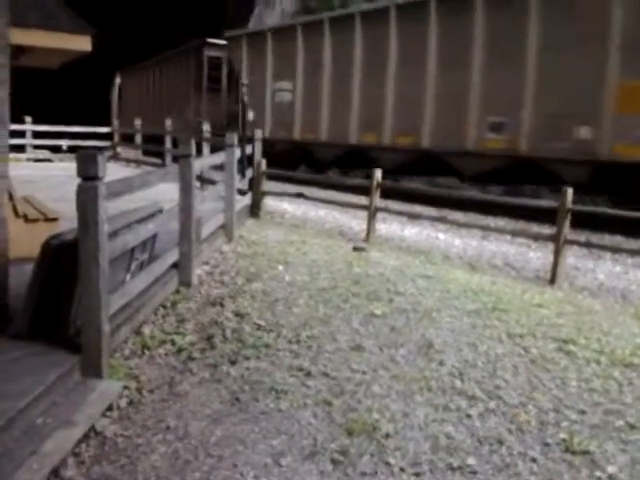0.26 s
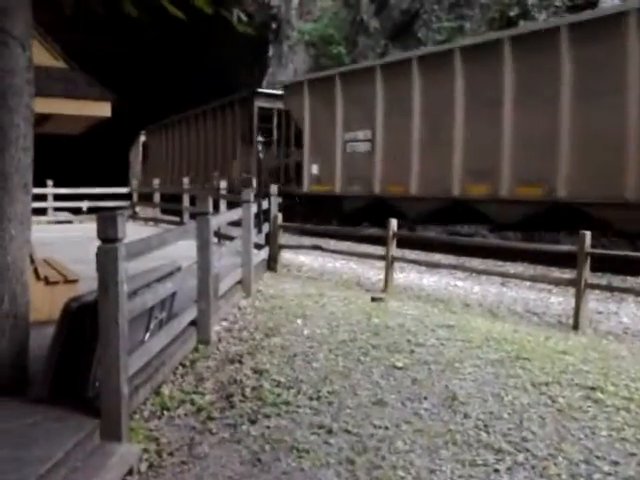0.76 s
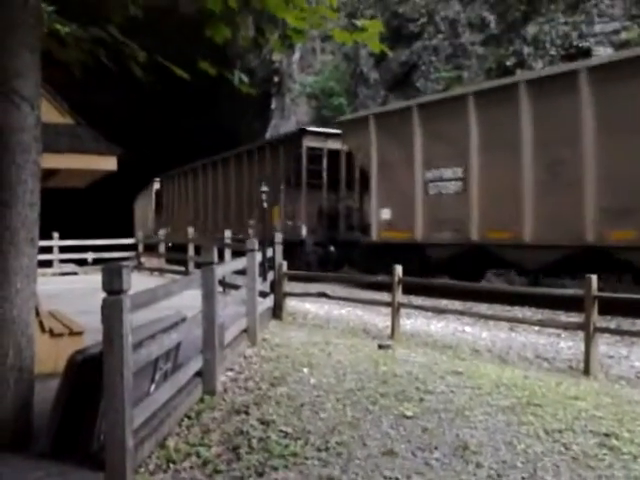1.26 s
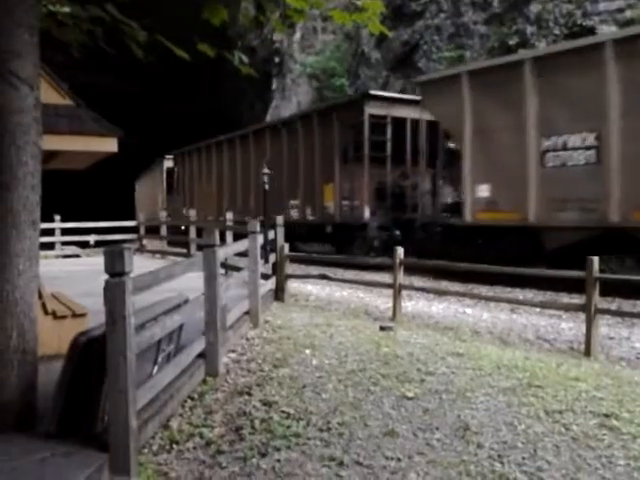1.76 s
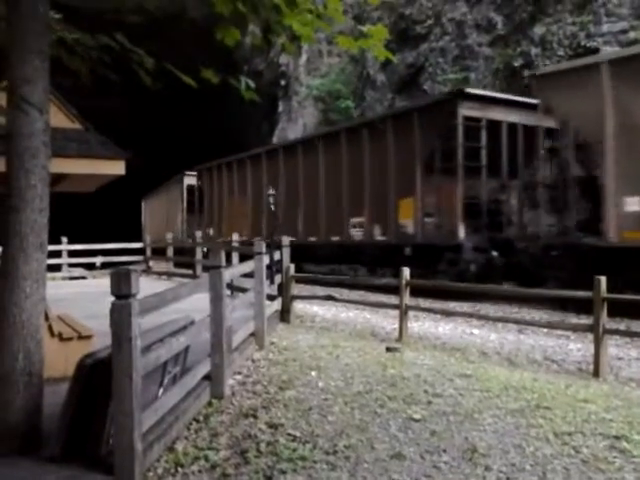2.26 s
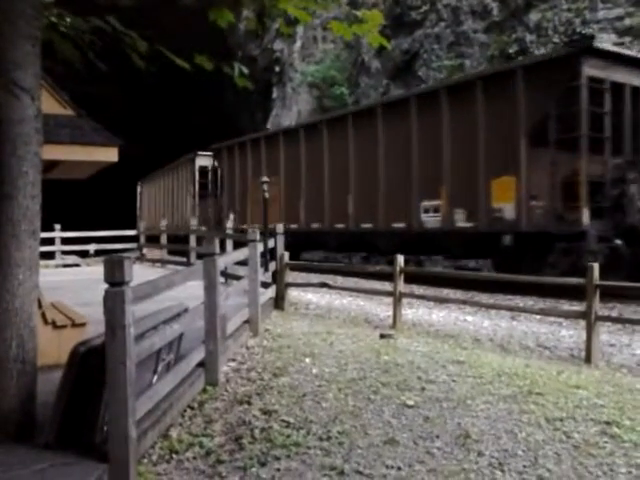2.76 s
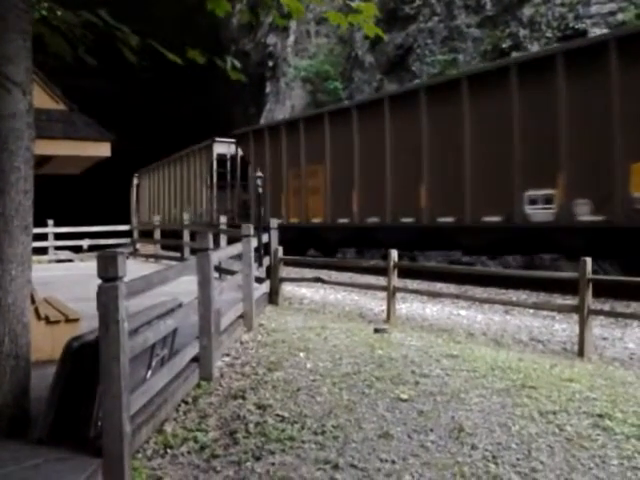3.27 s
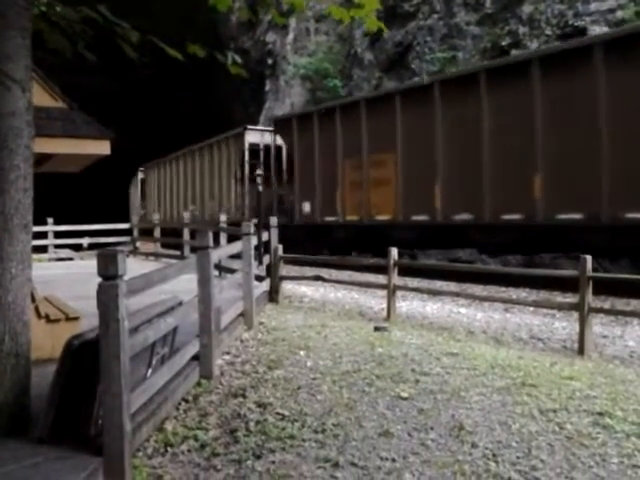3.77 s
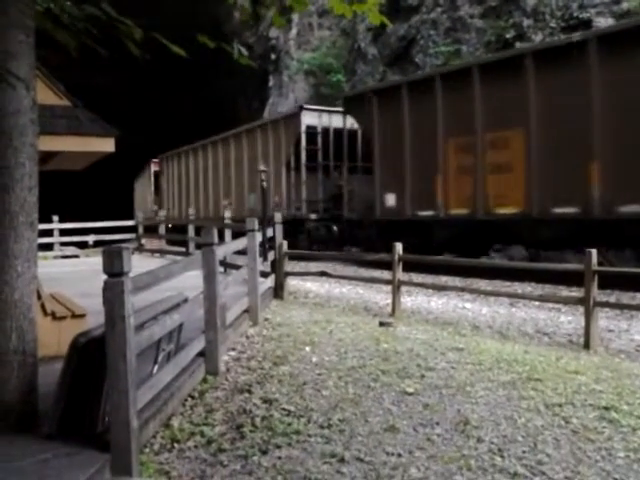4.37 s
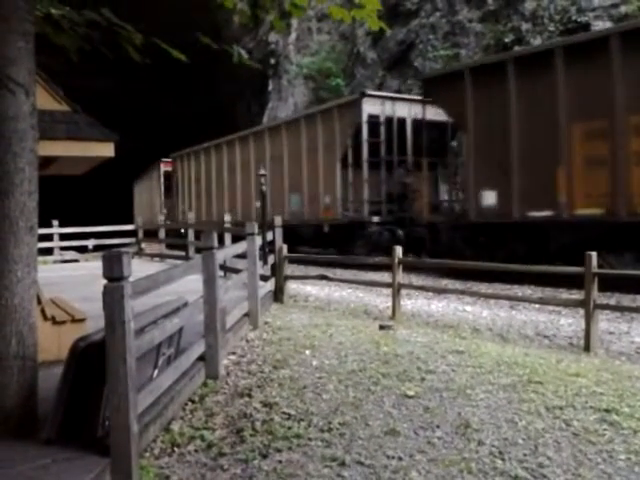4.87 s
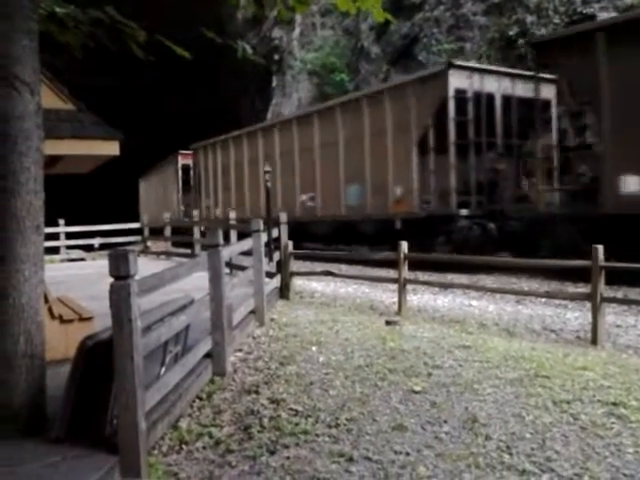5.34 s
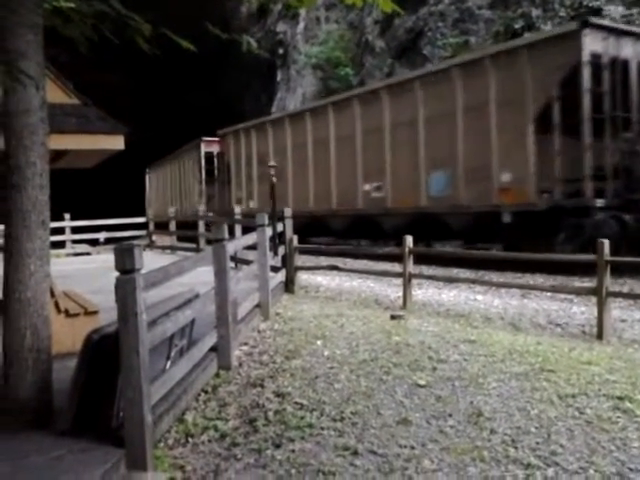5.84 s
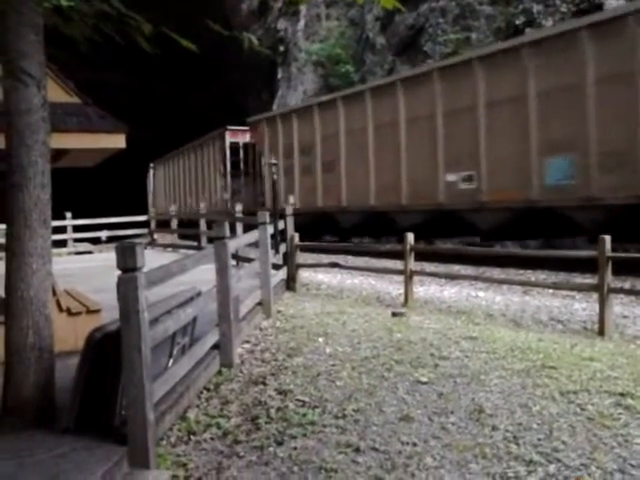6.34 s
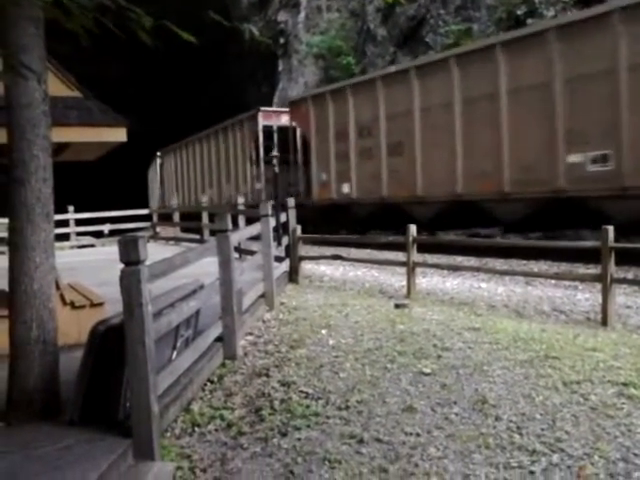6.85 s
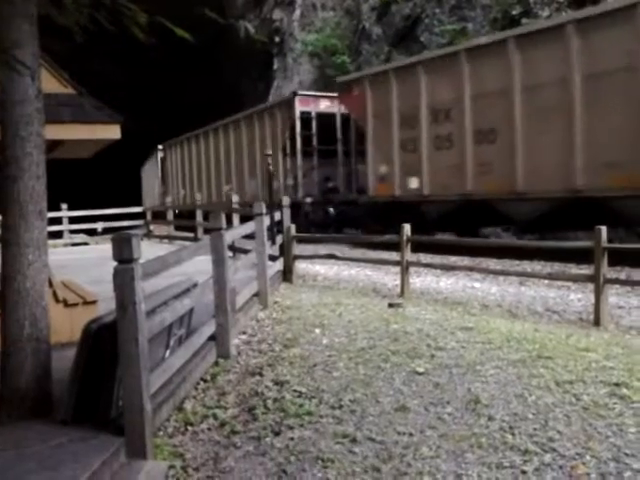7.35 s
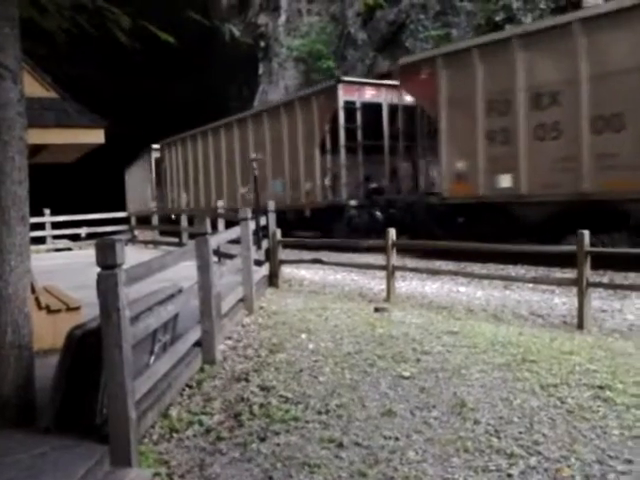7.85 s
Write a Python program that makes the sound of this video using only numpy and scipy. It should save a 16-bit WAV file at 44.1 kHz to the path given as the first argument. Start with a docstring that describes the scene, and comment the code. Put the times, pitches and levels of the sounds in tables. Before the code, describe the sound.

Continuous harsh screeching of steel wheels on rails as heavy hopper cars pass nearby. Very high whistling tones, some clean and some rough, overlap and swap quickly above scraping flange hiss and ringing metal. Around halfway the squealing eases, leaving fine sizzle, faint high chimes, rolling rumble and soft thuds, with a few later shrieks. Open-air rocky place, near microphone, identical channels, slightly overloaded at the loudest moments.

```python
"""Piercing wheel squeals over a bright flange hiss: loaded freight cars round a curve close by, under a rock face.
Treads creep sideways on the rail and lock one wheel mode after another: sines plus narrow noise.
Flanges grind with hiss, sizzle, rasp and disc ringing; rolling adds rumble, roar and rail ring: all filtered noise.
Other wheels chime faintly and bogies jolt. A limiter flattens the loudest screeching; both channels are equal."""
import sys
import numpy as np
from scipy import signal
from scipy.fft import rfft, irfft, next_fast_len
from scipy.io import wavfile
from scipy.ndimage import uniform_filter1d, minimum_filter1d

SR = 44100
rng = np.random.default_rng(int(sys.argv[2]) if len(sys.argv) > 2 else 0)


def file_out(sig):
    """Save sig as 16-bit WAV at sys.argv[1]."""
    # one column per channel
    cols = np.atleast_2d(sig).T
    # limit, then scale
    lim = np.clip(cols, -1, 1)
    pcm = np.round(lim * 32767).astype(np.int16)
    wavfile.write(sys.argv[1], SR, pcm)


N = 357651
TIME = np.arange(N) / SR
BINS_HZ = np.maximum(np.fft.rfftfreq(next_fast_len(N), 1 / SR), 1)


def from_db(db):
    """Decibels to amplitude gain."""
    return 10 ** (np.asarray(db) / 20)


def rms_one(x):
    """Scale to unit power."""
    return x / np.sqrt(np.mean(np.abs(x) ** 2) + 1e-20)


def in_time(rows):
    """Interpolate each column of a curve over TIME; the first column is time_s."""
    time_s, *columns = np.transpose(rows)
    return [np.interp(TIME, time_s, column) for column in columns]


def drift(rate_hz, size=N):
    """Smooth random signal of rms about 1 that changes about rate_hz times a second."""
    step = 10   # samples per slow point
    pole = np.exp(-2 * np.pi * rate_hz * step / SR)
    noise = rng.standard_normal(size // step + 4002)
    slow = signal.lfilter([1], [1, -2 * pole, pole * pole], noise)[4000:]   # skip the settling
    return np.interp(np.arange(size) / step, np.arange(len(slow)), rms_one(slow))


def colour(points):
    """Amplitude gain at every bin from a short spectrum, interpolated over log frequency."""
    hz, db = np.transpose(points)
    return from_db(np.interp(np.log(BINS_HZ), np.log(hz), db))


def shaped(force, gain):
    """A contact force heard through a frequency response; rms 1."""
    size = next_fast_len(N)
    return rms_one(irfft(rfft(force, size) * gain, size)[:N])


def friction(flutter_db, rate_hz):
    """Random contact force whose strength flutters as the surfaces catch and slip."""
    return rng.standard_normal(N) * from_db(flutter_db * drift(rate_hz))


def singing_mode(pitch_hz, rough, width_hz, wobble=0.000903):
    """A self-excited wheel mode: a steady sine plus its reflections, smeared by the motion of the cars."""
    size = len(pitch_hz)
    rough = np.clip(rough, 0, 1)
    wobbling_hz = pitch_hz * (1 + wobble * drift(14.96, size))
    phase = 2 * np.pi * np.cumsum(wobbling_hz) / SR
    cosine_part = drift(0.86 * width_hz, size) * np.cos(phase)
    sine_part = drift(0.69 * width_hz, size) * np.sin(phase)
    return np.sqrt(2 * (1 - rough)) * np.sin(phase) + np.sqrt(rough) * (cosine_part + sine_part)


# flange bites: centre_s, length_s (between 1/e points), rise_db
FLANGE_BITES = [(0.082, 0.044, 6.5), (0.193, 0.081, 5), (.272, .025, 6), (0.372, 0.044, 5), (.54, .036, 10),
                (.68, .1, 3.5), (1.33, 0.053, 0), (2.49, 0.045, 5), (4.0, .08, 5), (5.92, 0.12, 3.5),
                (6.654, 0.1, 2)]


def bite_db():
    """A flange bites hard: a short smooth bump in the grinding level."""
    return sum(db * np.exp(-(2 * (TIME - when) / length) ** 2) for when, length, db in FLANGE_BITES)


# wheel modes locking into squeals:
# start_s, length_s, build_up_s, mid_pitch_hz, level_db (before surge and bite), roughness (0 clean, 1 rough)
WHEEL_SQUEALS = [ (0, .88, 0.0024, 6220, -11, 0.12), (0, 0.78, 0.006, 4280, -28.5, 1),
                 (0, .28, .02, 1703, -38, 0.8), (0, 1.63, .4, 9140, -25, 0.8),
                 (0, 2.5, .2, 7210, -22.5, 1.1), (0, 0.73, .01, 13585, -27, .8),
                 (.04, 0.26, 0.025, 8230, -13.5, 0.45), (.3, 0.54, .1, 1163, -37, 0.76),
                 (.45, 2.3, .5, 13535, -21, .75), (.6, .5, .15, 8555, -22, .6),
                 (1.5, .9, .2, 936, -39, .45), (0.693, 0.62, 0.19, 1707, -36, 0.5),
                 (0.697, 4.2, 0.3, 2567, -30.5, 0.65), (0.748, 1.58, .1, 6210, -20, 0.52),
                 (0.749, 1.14, 0.14, 8085, -18, .45), (1.048, 0.24, 0.088, 3460, -27.5, 0.15),
                 (1.05, .26, .1, 5250, -29, 0.3), (1.36, 0.26, 0.11, 5270, -25, 0.2),
                 (1.133, 0.6, 0.12, 936, -33, 0.1), (1.152, 0.34, .1, 4335, -32.5, 0.3),
                 (1.453, 0.36, .18, 4330, -25.5, .3), (1.652, .29, .04, 5238, -23, 0.1),
                 (1.723, 0.44, .08, 8200, -17.5, 0.9), (1.897, 2.9, .15, 6430, -33, 0.7),
                 (1.947, 0.75, 0.12, 7290, -16.5, .7), (1.952, 2.6, 1, 9210, -19, 0.83),
                 (2.15, 0.6, 0.11, 5290, -25.5, 0.45), (2.35, 1, 0.097, 8270, -17.5, 0.66),
                 (2.481, .28, 0.058, 7298, -13, 0.4), (2.498, 0.17, .04, 6360, -17, .3),
                 (2.619, 0.49, 0.11, 6390, -21.5, .55), (2.57, 0.43, 0.18, 3505, -20.5, 0.16),
                 (2.618, 0.34, .12, 5390, -18.5, 0.2), (2.758, 0.47, 0.062, 1713, -32, 0.2),
                 (2.717, 1.66, 0.064, 7325, -21, 0.74), (2.8, 0.97, .2, 8470, -21, 0.8),
                 (2.798, 1.1, 0.22, 11300, -28.5, .6), (2.92, 0.45, 0.067, 5358, -17, 0.48),
                 (3.0, 0.9, 0.053, 3486, -29.5, 0.37), (3.1, 0.81, .25, 10050, -26, 0.5),
                 (3.268, 0.3, 0.045, 7280, -14, .4), (3.3, 0.32, 0.072, 9120, -11.5, .45),
                 (3.328, 0.415, 0.072, 6350, -18, 0.2), (3.492, 0.2, .07, 8280, -10, 0.3),
                 (3.598, 0.35, 0.16, 5330, -18, 0.4), (3.853, 0.24, .1, 8400, -17, 0.6),
                 (3.881, .22, .08, 7260, -22, .5), (4.02, 0.22, 0.023, 5320, -21.5, 0.42),
                 (4.147, 0.37, .05, 5360, -30, 0.65), (4.09, 0.26, 0.048, 960, -36, 0.25),
                 (4.08, 0.23, 0.063, 2594, -27.5, 0.5), (4.3, 0.65, .2, 8580, -36, 0.5),
                 (4.42, 1.04, 0.32, 6485, -21, 0.9), (4.75, .47, .15, 9410, -24.5, .6),
                 (4.85, .55, .2, 2951, -37, .6), (5.3, 1.7, .2, 13610, -32.5, .9),
                 (5.75, .67, .15, 15042, -28.5, .45), (5.8, 1.6, .25, 8085, -27, .7),
                 (5.85, .8, .2, 10630, -29, .6), (5.9, .52, .15, 12912, -30.5, .6),
                 (5.95, .7, .15, 14547, -34.5, .6), (6.0, .7, .15, 14249, -35.5, .6),
                 (6.3, .35, .08, 8048, -15, .25), (6.4, .5, .12, 14985, -33, .6),
                 (6.64, .22, .08, 8975, -22, .5), (6.747, 0.37, .06, 6430, -29.5, .8),
                 (6.947, 1.54, 0.55, 6260, -21, 0.86), (6.85, 1.68, 0.14, 841, -45, 0.7),
                 (6.954, 0.46, .2, 5350, -34, .6), (7.36, .23, .05, 9436, -21.5, .55),
                 (7.36, .26, .08, 7452, -21, .55), (7.38, .22, .06, 5518, -32.5, .55),
                 (7.72, 0.25, 0.084, 2182, -27, 0.6), (7.713, 0.63, .08, 6660, -32, .6)]
RELEASE_SHARE = 0.28   # last part of the squeal, dying away
SINK_PER_S = .0045   # share of mid pitch
CLEAN_WIDTH, ROUGH_WIDTH = 0.0043, 0.012   # width as a share of pitch; what full roughness adds
BITE_CHOKE, BITE_FEED = 2.2, 0.45   # dB per bite dB: lost by a clean squeal, gained by a rough one


def squeals(surge_db=2.0, surge_rate_hz=6):
    """Stick-slip builds a mode up, holds it in uneven surges, lets go; pitch sinks as the wheel goes by."""
    out, bite = np.zeros(N), bite_db()
    for start, length, build_up, mid_hz, level_db, rough in WHEEL_SQUEALS:
        on = (TIME >= start) & (TIME < start + length)
        age = TIME[on] - start
        attack = np.minimum(age / build_up, 1)
        release = np.minimum((length - age) / (RELEASE_SHARE * length), 1)
        pitch_hz = mid_hz * (1 - SINK_PER_S * (age - length / 2))
        surge = surge_db * rough * drift(surge_rate_hz, len(age))   # a cleanly locked mode holds steady
        bitten = bite[on] * (BITE_FEED * rough - BITE_CHOKE * (1 - rough) ** 2)
        width_hz = mid_hz * (CLEAN_WIDTH + ROUGH_WIDTH * rough ** 2)
        mode = singing_mode(pitch_hz, rough, width_hz)
        out[on] += attack * release * from_db(level_db + surge + bitten) * mode
    return out


# flange grinding curves, before offsets and bites: time_s, grind_db, sizzle_db
GRIND_CURVE = [(0.0, -25.5, -23), (0.56, -27.5, -25.5), (0.83, -23, -18.5), (1.72, -21, -18),
               (2.19, -17, -18.5), (2.73, -25.5, -21), (3.05, -22, -19), (3.88, -19, -19),
               (4.18, -26.5, -22), (4.77, -26, -21.5), (5.71, -29, -20), (6.28, -27, -23.5),
               (6.5, -27, -21.5), (7.05, -26.5, -21), (7.68, -24.5, -22), (8.11, -26.5, -21.5)]
# broad rasp of the hardest-pressed flanges: time_s, level_db
RASP_CURVE = [(0, -21), (.65, -19), (1.0, -23.5), (1.8, -24.5), (2.2, -21.5), (3.2, -19), (3.9, -22.5),
              (4.15, -25.5), (4.5, -28), (5.4, -28), (8.11, -66)]
# wheel-disc modes kept ringing by the grinding: centre_hz, width_hz (full, at -6 dB), relative_db
DISC_MODES = [(826, 30, -25.5), (1702, 26, -15), (2563, 270, -11.5), (2996, 150, -19.5), (3470, 51, -15.5),
              (3842, 78, -16.5), (4455, 220, -9.5), (5332, 200, -10), (6293, 300, -6.5), (7205, 97, -3),
              (8270, 210, 1), (8640, 220, -8.5), (9080, 200, -2.5)]
# hiss spectrum: freq_hz, relative_db_per_hz
HISS_SPECTRUM = [(5600, -56), (6200, -22), (6600, -4.5), (6950, -4), (7250, -1), (7700, 3.5), (8100, 5),
                 (8600, 0.5), (9200, -3.5), (9600, -7.5), (10500, -17.5), (13000, -43)]
# sizzle spectrum: freq_hz, relative_db_per_hz
SIZZLE_SPECTRUM = [(6000, -49), (8000, -2), (9700, 3), (10700, 4), (11700, 1.5), (12400, -0.5), (13200, -7),
                   (14300, -5.5), (15400, -4)]
# rasp spectrum: freq_hz, relative_db_per_hz
RASP_SPECTRUM = [(2000, -16), (2900, 8), (4300, 3), (5700, 3), (8000, -16.5), (12000, -8), (14000, 4.5),
                 (15500, 2)]
HISS_DB, RINGING_DB, SIZZLE_DB = 7, 4, 2.5   # over the grind, grind and sizzle curves


def flanges():
    """Steel scraping steel: hiss near 8 kHz, finer sizzle above, broad rasp, ringing wheel discs."""
    bite = bite_db()
    grind_db, sizzle_db = [curve + bite for curve in in_time(GRIND_CURVE)]
    rasp_db = in_time(RASP_CURVE)[0]
    catching = from_db(1.15 * drift(3.6))   # the flange bites and lets go
    hiss = from_db(grind_db + HISS_DB) * shaped(friction(1.5, rate_hz=120), colour(HISS_SPECTRUM))
    sizzle = from_db(sizzle_db + SIZZLE_DB) * shaped(friction(1.5, rate_hz=97), colour(SIZZLE_SPECTRUM))
    rasp = from_db(rasp_db) * shaped(friction(2.5, rate_hz=69), colour(RASP_SPECTRUM))
    mode_power = np.zeros(len(BINS_HZ))
    for centre_hz, width_hz, db in DISC_MODES:
        detune = 2 * (BINS_HZ - centre_hz) / width_hz
        mode_power += from_db(db) ** 2 / width_hz / (1 + detune ** 2) ** 2
    ringing = from_db(grind_db + RINGING_DB) * shaped(rng.standard_normal(N), np.sqrt(mode_power))
    return catching * (hiss + ringing) + sizzle + rasp


# rolling curves, before offsets: time_s, roar_db, rail_ring_db
ROLL_CURVE = [(0.0, -28, -28), (1.51, -31, -28.5), (1.67, -34, -30), (2.05, -29.5, -26.5), (2.26, -31, -24),
              (2.33, -32.5, -28.5), (2.87, -28.5, -24), (2.98, -31.5, -28.5), (3.21, -32.5, -21.5),
              (3.45, -28, -26.5), (4.06, -32.5, -27), (4.54, -36, -29), (5.28, -33.5, -27.5),
              (5.38, -36.5, -29.5), (6.66, -35.5, -30), (7.07, -32, -26), (8.06, -34.5, -29),
              (8.11, -37, -28)]
# car-body rumble: time_s, level_db
RUMBLE_CURVE = [(0, -35.5), (.8, -38), (3.0, -37), (3.3, -35), (3.95, -38), (4.2, -37), (5.25, -33.5),
                (5.6, -36), (6.6, -35), (7.0, -32.5), (7.6, -34.5), (8.11, -34.5)]
# rumble spectrum: freq_hz, relative_db_per_hz
RUMBLE_SPECTRUM = [(25, -15), (62, -12), (100, -21), (140, -13), (195, -6.5), (235, -5), (285, 0.5),
                   (318, -0.5), (338, 7), (358, 0), (450, -2.5), (700, -17.5)]
# roar spectrum: freq_hz, relative_db_per_hz
ROAR_SPECTRUM = [(150, -42), (300, -16), (480, -2), (850, -0.5), (1200, 0), (2000, -12), (3200, -8.5),
                 (4200, -5), (5800, -5.5), (8000, -23), (15000, -13)]
# rail-ring spectrum: freq_hz, relative_db_per_hz
RAIL_SPECTRUM = [(900, -47), (1300, -7.5), (1500, -1), (1750, -2), (2050, 2), (2400, -2.5), (2750, -3.5),
                 (3050, -14), (3400, -10), (5000, -38)]
ROAR_DB, RAIL_DB = 4.5, 1.5   # over the rolling curves


def rolling():
    """Rough treads shake the car bodies, roar on the track and set the rails ringing near 2 kHz."""
    roar_db, rail_db = in_time(ROLL_CURVE)
    rumble_db = in_time(RUMBLE_CURVE)[0]
    rumble = from_db(rumble_db) * shaped(friction(1.9, rate_hz=9.5), colour(RUMBLE_SPECTRUM))
    roar = from_db(roar_db + ROAR_DB) * shaped(rng.standard_normal(N), colour(ROAR_SPECTRUM))
    rail = from_db(rail_db + RAIL_DB) * shaped(friction(1.1, rate_hz=25), colour(RAIL_SPECTRUM))
    return rumble + roar + rail


def far_wheels(count=190, below_sizzle_db=-12.0, spread_db=3.0, dulling_db=2.5):
    """Many other wheels chime faintly in their high modes, swelling with the sizzle curve."""
    out = np.zeros(N)
    for when, lasting, pitch, strength in rng.random((count, 4)):
        length_s = .3 + .6 * lasting
        place = (TIME - when * N / SR) / length_s
        on = np.abs(place) < .5
        pitch_hz = np.full(on.sum(), 7000 + 8600 * pitch)
        level_db = spread_db * (2 * strength - 1) + dulling_db * (1 - 2 * pitch)   # higher modes are weaker
        swell = np.cos(np.pi * place[on])
        out[on] += from_db(level_db) * swell * singing_mode(pitch_hz, rough=0.92, width_hz=26)
    sizzle_db = in_time(GRIND_CURVE)[1]
    return from_db(sizzle_db + below_sizzle_db) * out


# dull bogie jolts: start_s, level_db (before the trim)
BOGIE_JOLTS = [(4.15, -29), (4.404, -26.5), (5.25, -28), (6.785, -30), (7.01, -30), (7.21, -22.5),
               (7.588, -32), (8.022, -27)]
# jolt spectrum: freq_hz, relative_db_per_hz
JOLT_SPECTRUM = [(30, 1), (90, 6), (140, -13), (200, 0.5), (320, 3.5), (500, 3), (1200, -15)]


def jolts(rise_s=0.017, trim_db=-2.0):
    """A bogie drops over a rough spot and the loaded body booms briefly."""
    blow = np.zeros(N)
    for when, level_db in BOGIE_JOLTS:
        age = np.maximum(TIME - when, 0) / rise_s
        blow += from_db(level_db + trim_db) * age * np.exp(1 - age)
    return blow * shaped(rng.standard_normal(N), colour(JOLT_SPECTRUM))


def scene():
    """Sum all sources at one microphone; two equal channels."""
    train = squeals() + flanges() + rolling() + far_wheels() + jolts()
    return np.stack([train, train])


CEILING = 0.7   # highest crest that the limiter passes
BASS_CUT_HZ, TOP_CUT_HZ = 160, 15680


def record(dry):
    """A very fast limiter flattens the crests of the screech; then the bass and the top are cut."""
    crest = np.abs(signal.hilbert(dry[0], next_fast_len(N))[:N])
    gain = 1 / (1 + (crest / CEILING) ** 12) ** (1 / 12)
    gain = minimum_filter1d(gain, size=11)   # sizes in samples
    gain = uniform_filter1d(uniform_filter1d(gain, size=9), size=7)
    bass_cut = signal.butter(4, BASS_CUT_HZ, "high", fs=SR, output="sos")
    top_cut = signal.ellip(14, .1, 80, TOP_CUT_HZ, fs=SR, output="sos")
    return signal.sosfilt(top_cut, signal.sosfilt(bass_cut, dry * gain))


dry = scene()
out = record(dry)
file_out(out)
```